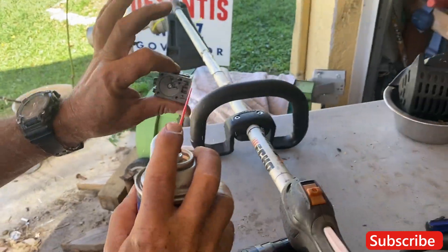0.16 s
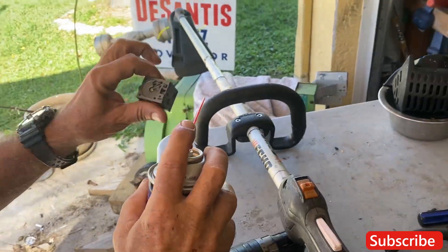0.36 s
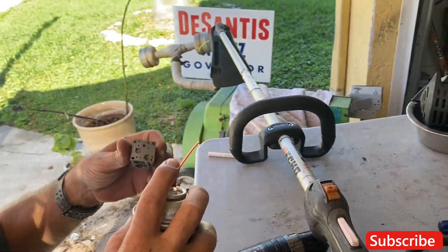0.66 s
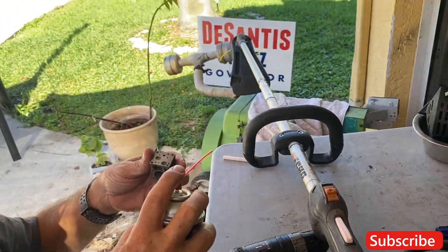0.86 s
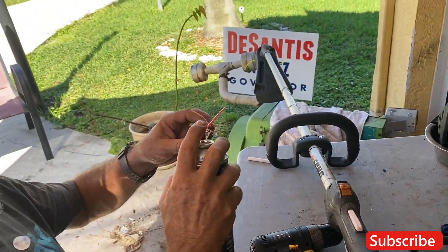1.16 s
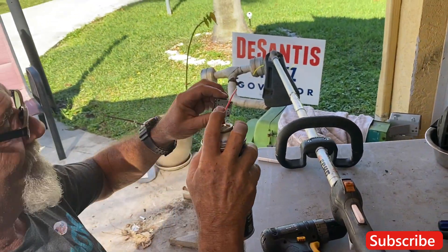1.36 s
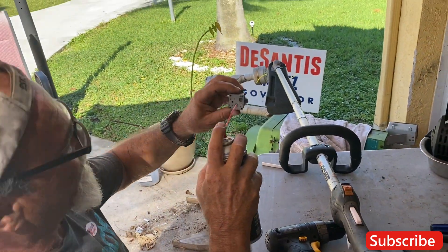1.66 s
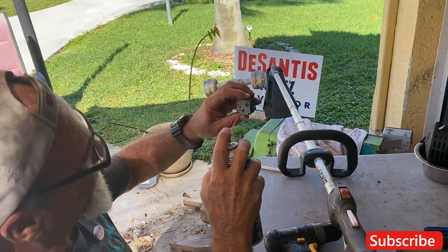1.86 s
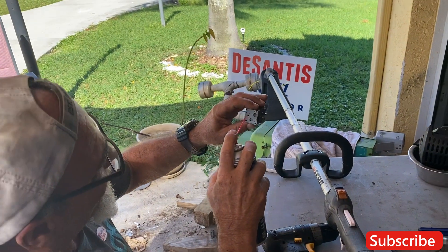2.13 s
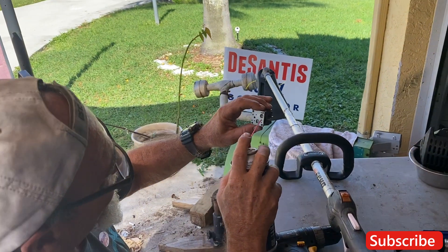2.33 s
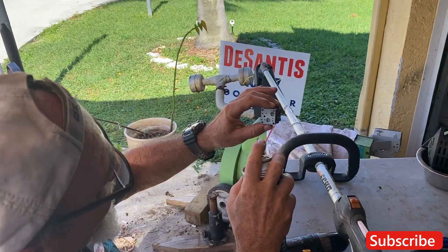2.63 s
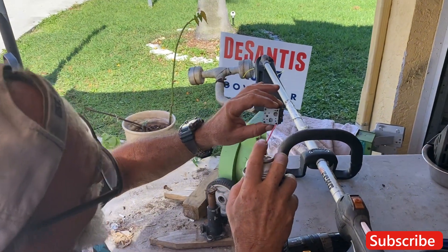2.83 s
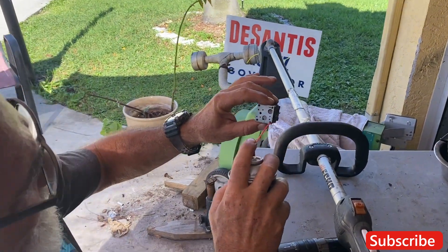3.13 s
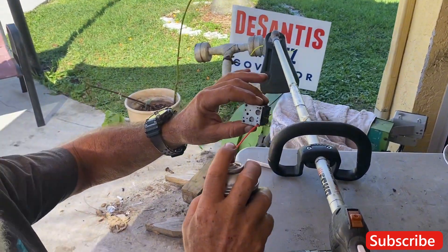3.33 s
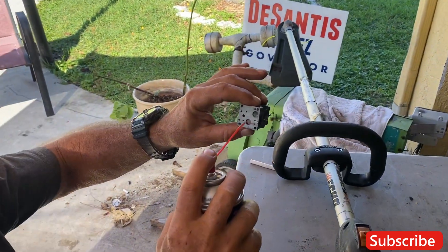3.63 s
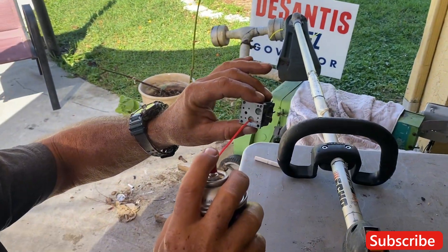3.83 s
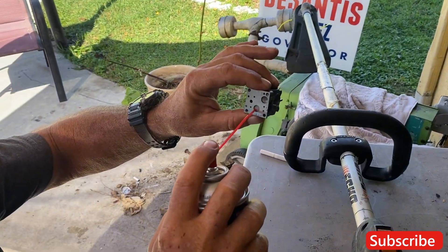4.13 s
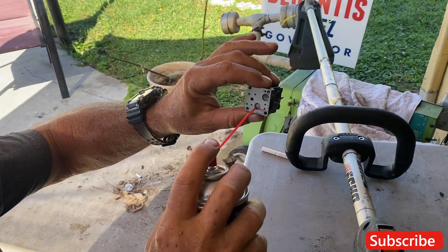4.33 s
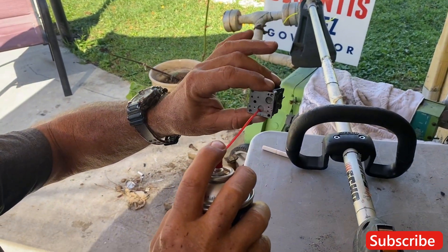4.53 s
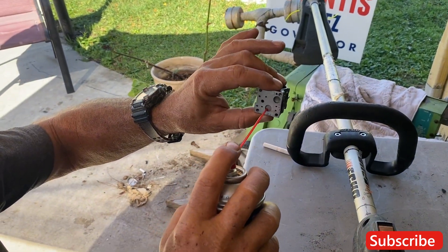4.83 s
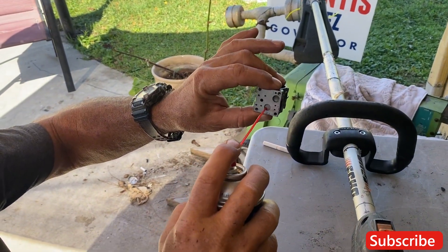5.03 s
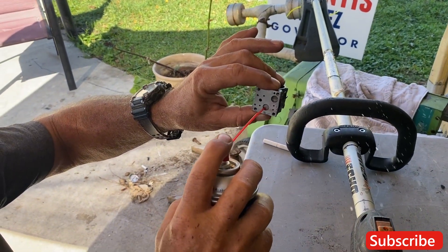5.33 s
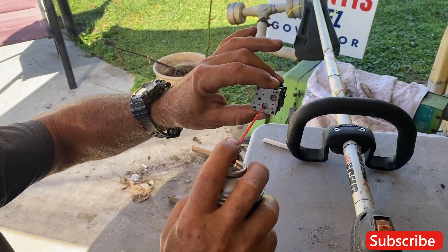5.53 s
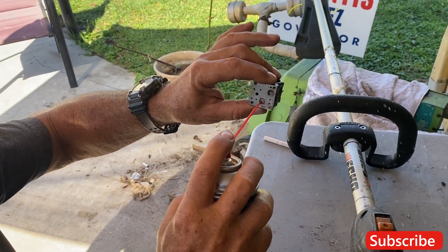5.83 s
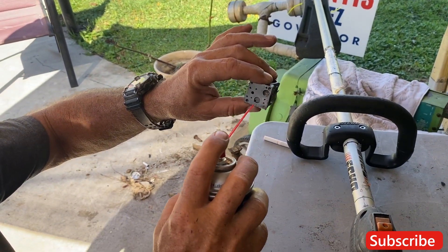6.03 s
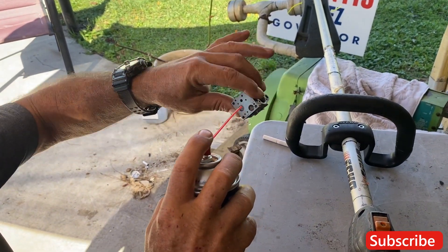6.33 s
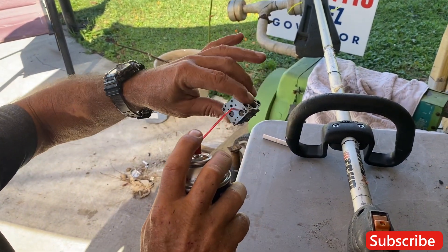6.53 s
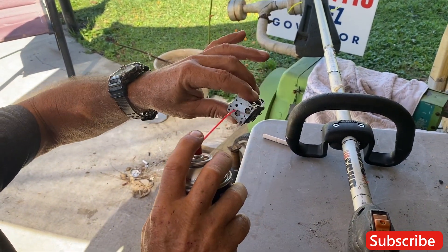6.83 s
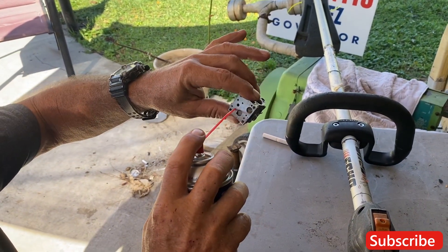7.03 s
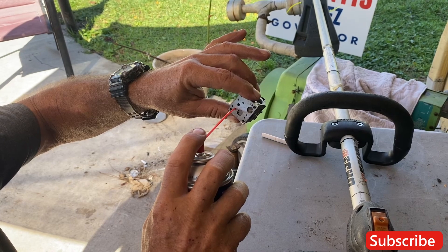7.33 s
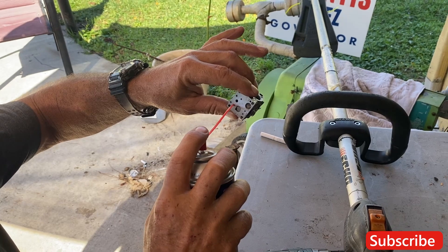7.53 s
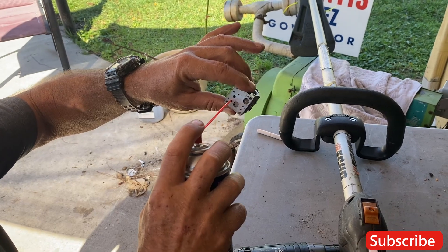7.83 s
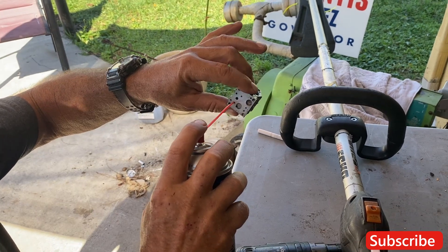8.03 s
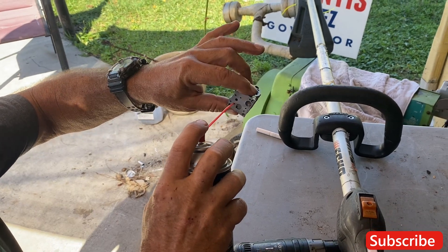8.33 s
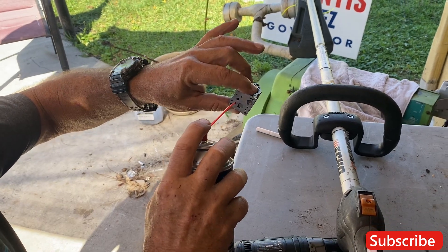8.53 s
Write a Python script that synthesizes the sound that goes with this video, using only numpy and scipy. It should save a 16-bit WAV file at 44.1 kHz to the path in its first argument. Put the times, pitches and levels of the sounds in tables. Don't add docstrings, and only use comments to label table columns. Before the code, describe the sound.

Throughout, soft low outdoor rumble and street wash, with a thin buzzing whine and hiss of a distant motor that sinks away after about 4.5 seconds. At 0.1 a knock and metal tick with soft bumps; around 0.5 a cluster of light clicks and a scuff. Quiet until dull bumps at 1.4-1.5. From 2.2 to 3 cloth drags, a faint low seat creak and a sharp snap at 2.58. A small part bounces three times at 3.35-3.45, then steps and raps to 3.95, with more thumps at 4.45-4.6. From 4.8 an aerosol sputters in tiny squeaky spits, swelling to a strong hiss near 5.25 and again at 5.7 alongside clacks and a deep jolt. Sparse scuffs and scrapes follow, with knocks and a stronger cloth rub around 7.25-7.4. At 8.26 a loud ringing bang with garage echo, then weak whistling spurts until 8.68.

```python
import sys
import numpy as np
from scipy import signal
from scipy.fft import rfft, irfft, next_fast_len
from scipy.io import wavfile
from scipy.ndimage import uniform_filter1d, map_coordinates

SR = 44100
rng = np.random.default_rng(int(sys.argv[2]) if len(sys.argv) > 2 else 0)


def put_to_file(sound):
    columns = np.atleast_2d(sound).T
    safe = np.clip(columns, -1, 1)
    whole_steps = np.round(safe * 32767)
    wavfile.write(sys.argv[1], SR, whole_steps.astype(np.int16))


def amplitude_ratio(level_db):
    exponent = np.asarray(level_db, float) / 20
    return 10 ** exponent


N = 382788

# pitch_hz, level_db (per Hz)
FIZZ_COLOUR = [(5000, -27.5), (8500, -9), (9960, -4), (11000, -12), (12300, -11), (15800, -17.5)]
# pitch_hz, lead_radians
OPEN_LEAD = [(0, -2), (520, -0.57), (1290, -3.5), (2580, -1.45), (6890, -2.5), (9500, 0), (16000, 15.5)]
# pitch_hz, likeness_0_to_1
CONTACT_ALIKE = [(60, 0.79), (240, 0.9), (950, 0.38), (15000, 0.4)]


def unit(x):
    return x / np.sqrt(np.mean(x ** 2) + 1e-20)


def along(points, hz):
    f, v = np.transpose(points)
    return np.interp(np.log(hz + 1), np.log(f + 1), v)


def curves(*tables):
    t = np.arange(N) / SR
    parts = []
    for rows in map(np.array, tables):
        parts.append([np.interp(t, rows[:, 0], c, left=-200, right=-200) for c in rows.T[1:]])
    return np.max(parts, axis=0)


def wobble(rate):
    steps = np.arange(0, N + 32, 32)
    knots = rng.standard_normal(int(N * rate / SR) + 4)
    smooth = map_coordinates(knots, [steps * rate / SR], mode="nearest")
    return np.interp(np.arange(N), steps, smooth)


def filtered(x, response):
    m = next_fast_len(x.shape[-1] + 4096)
    return irfft(rfft(x, m) * response(np.fft.rfftfreq(m, 1 / SR)), m)[..., :x.shape[-1]]


def peaks(modes, hz, base_db):
    return amplitude_ratio(base_db) + sum(amplitude_ratio(db) * w * w / (w * w + 4 * (hz - c) ** 2) for c, w, db in modes)


def ports(pair, lead, alike, shade=((1, 0),)):
    def side(sign):
        def response(hz):
            turn = np.arccos(np.clip(along(alike, hz), 0, 1)) / 2 * hz / (hz + 50)
            lead_radians = np.interp(hz, *np.transpose(lead)) - lead[0][1]
            lag = amplitude_ratio(.5 * sign * along(shade, hz)) * np.exp(.5j * sign * lead_radians)
            return lag * [np.cos(turn), sign * np.sin(turn)]
        return filtered(pair, response).sum(axis=0)
    return np.array([side(1), side(-1)])


def rush(colour, patchy_db, size=(3, 10)):
    z = signal.stft(rng.standard_normal((2, N)), nperseg=256)[2]
    field = uniform_filter1d(rng.standard_normal(z.shape[1:]), size=size[0], axis=0)
    field = uniform_filter1d(field, size=size[1], axis=1)
    pair = signal.istft(z * amplitude_ratio(patchy_db * unit(field)), nperseg=256)[1][:, :N]
    return unit(filtered(pair, colour))


def whine():
    # multiple_of_shaft, level_db, upper_sideband_db
    orders = [(14, -10, -7), (15, -5, -9), (16, 0, -4), (17, -8, -12), (18, -4, -4), (19, -11, -12),
              (20, 0, -3), (21, -4, -8), (22, -4, -2), (23, -5, -11), (24, -11, -12), (25, -2, -5),
              (26, -13, -11), (27, -4, -5), (28, -11, -9), (29, -3, 1), (30, -13, -10), (31, -5, -4),
              (32, -12, -12), (33, -14, -16)]
    shaft_hz, shaft_sag_hz_per_s2 = 263.9, .07
    sideband_hz, sideband_sag_hz_per_s, lower_db = 118, 5.5, -5
    t = np.arange(N) / SR
    turn = 2 * np.pi * (shaft_hz * t - shaft_sag_hz_per_s2 * np.minimum(t, 4.5) ** 3 / 3)
    turn = turn + .3 * wobble(2) + .025 * wobble(30)
    slow = 2 * np.pi * (sideband_hz * t - sideband_sag_hz_per_s * t * t / 2) + 1.5 * wobble(3)
    turn, slow = (np.float32(x % (2 * np.pi)) for x in (turn, slow))
    lines = []
    for k, own_db, upper_db in orders:
        lines += [(k, 0, own_db), (k, 1, upper_db), (k, -1, upper_db + lower_db)]
    swell = amplitude_ratio(5 * np.array([wobble(2) for _ in range(8)]))
    tones = 0
    for n, (k, side, db) in enumerate(lines):
        tones = tones + amplitude_ratio(db) * swell[n % 8] * np.sin(k * turn + side * slow + n * n)
    dying = amplitude_ratio(-3 * np.clip(t - 4.5, 0, 3))
    return dying * unit(tones)


def air():
    # time_s, level_db
    street_level = [(0.0, -53.5), (0.24, -57.5), (0.75, -61), (1.57, -58.5), (2.25, -61.5), (3.41, -58),
                    (3.53, -52.5), (4.25, -59), (4.64, -55.5), (4.91, -59.5), (5.97, -58.5), (6.55, -60),
                    (7.3, -60), (8.68, -59.5)]
    traffic_level = [(0.0, -52), (0.3, -60), (0.77, -65), (1.59, -55), (2.3, -65), (2.9, -55), (4.71, -46),
                     (4.95, -55), (5.4, -48), (6.9, -55), (8.68, -49)]
    hiss_level = [(0, -62.5), (.8, -61.5), (3.9, -62), (4.3, -67), (5.5, -71), (6.4, -80), (7.7, -79.5),
                  (8.68, -64)]
    # pitch_hz, level_db (per Hz)
    rumble_colour = [(15, -46), (25, -23), (49, -5.5), (71, -3.5), (129, -9), (300, -28), (390, -78.5),
                     (660, -120)]
    street_colour = [(88, -7.5), (150, -6.5), (512, -12.5), (850, -14), (1380, -24), (7680, -37.5),
                     (10100, -49), (11800, -49), (15800, -56)]
    hiss_colour = [(880, -45.5), (1500, -5.5), (3270, -6.5), (3820, 0), (7470, -3), (8580, -3),
                   (10000, -14), (10900, -17), (13200, -17), (15800, -41)]
    # pitch_hz, likeness_0_to_1
    air_alike = [(60, 0.88), (240, 0.65), (950, 0), (4000, 0.21), (15000, .6)]
    (street_db,), (traffic_db,), (hiss_db,) = curves(street_level), curves(traffic_level), curves(hiss_level)
    rumble = rush(lambda hz: amplitude_ratio(along(rumble_colour, hz)), patchy_db=2.5)
    rumble = amplitude_ratio(traffic_db + 0.5 + 2.2 * wobble(9)) * rumble
    street = rush(lambda hz: amplitude_ratio(along(street_colour, hz)), patchy_db=.6)
    street = amplitude_ratio(street_db + 3.5 + 0.99 * wobble(4)) * street
    hiss = rush(lambda hz: amplitude_ratio(along(hiss_colour, hz)), patchy_db=3, size=(2, 90))
    hiss = hiss + amplitude_ratio(0.5) * whine() * [[1], [.3]]
    return ports(rumble + street + amplitude_ratio(hiss_db) * hiss, OPEN_LEAD, air_alike)


def stand():
    # start_s, peak_db, pitch_hz
    shakes = [(.004, -33, 47.8), (0.089, -30.5, 126.5), (0.139, -38, 68.5), (0.483, -40, 121),
              (1.412, -40, 121), (1.493, -38, 78.6), (1.887, -44.5, 71.5), (3.592, -34, 140),
              (3.824, -32, 39.3), (3.823, -23, 62), (3.94, -26.5, 158), (4.449, -29, 66),
              (4.468, -27.5, 134.5), (4.596, -27, 49.8), (4.67, -30, 71.8), (5.246, -33, 52.7),
              (5.73, -21, 58.3), (6.094, -37.5, 81.7), (6.427, -39.5, 50), (7.249, -28, 57.3)]
    # start_s, peak_db, pitch_hz
    jolts = [(4.788, -37.5, 75.4), (6.005, -34.5, 56), (7.517, -35, 55), (7.607, -33, 40.4),
             (7.607, -25.5, 85), (8.53, -41, 70), (8.257, -27, 40.4), (8.26, -25, 150), (8.298, -30, 95),
             (3.465, -36, 160), (6.56, -38, 66)]
    rock_db = -16.5
    out, t = np.zeros((2, N + SR)), np.arange(SR // 2) / SR
    swings = [(s, db, hz, .41 * (60 / hz) ** .66) for s, db, hz in shakes]
    swings += [(*row, .19) for row in jolts]
    for s, db, hz, t60 in swings:
        upper, turn = rng.uniform([1.4, 0], [1.9, 2 * np.pi])
        swing = np.sin(2 * np.pi * hz * t) + 0.3 * np.sin(2 * np.pi * upper * hz * t + turn)
        swing = swing + amplitude_ratio(rock_db) * np.outer([1, -1], np.sin(2 * np.pi * hz * t + 3 * turn))
        fade_db = -60 * (t / t60) ** 1.16
        out[:, round(s * SR):][:, :len(t)] += amplitude_ratio(db + fade_db) * (1 - np.exp(-t / 0.0034)) * swing
    return out[:, :N]


def scuffs():
    # start_s, hardest_s, end_s, level_db
    drags = [(.53, .555, .63, -62), (2.188, 2.25, 2.45, -63), (2.4, 2.46, 2.62, -56),
             (2.45, 2.52, 2.68, -58), (2.575, 2.59, 2.66, -56), (2.637, 2.794, 3.0, -67.5),
             (3.105, 3.122, 3.37, -63), (4.186, 4.236, 4.44, -69.5), (5.867, 5.885, 5.96, -62.5),
             (5.95, 6.2, 6.35, -71), (6.554, 6.625, 6.7, -65.5), (7.33, 7.355, 7.46, -47)]
    # pitch_hz, level_db (per Hz)
    cloth = [(180, -46), (300, 7.5), (337, -14), (443, -8), (490, -2.5), (3120, -5.5), (9500, -20.5),
             (12400, -72), (20900, -120)]
    # time_s, pitch_hz, level_db
    seat = [
        (2.41, 257.4, -72),
        (2.47, 254, -62),
        (2.545, 247.5, -60),
        (2.56, 242, -68),
    ]
    strokes = [[(start, db - 12), (hardest, db), (end, db - 22.5)] for start, hardest, end, db in drags]
    drag_db, = curves(*strokes)
    grains = amplitude_ratio(drag_db + 10.0 + 1.2 * wobble(90))
    body = rush(lambda hz: amplitude_ratio(along(cloth, hz)), patchy_db=1.5)
    fizz = rush(lambda hz: amplitude_ratio(along(FIZZ_COLOUR, hz)), patchy_db=7)
    creak_hz, creak_db = curves(seat)
    phase = 2 * np.pi * np.cumsum(creak_hz) / SR
    creak = np.sin(phase) + 0.2 * np.sin(2 * phase) + 0.12 * np.sin(3 * phase)
    return ports(grains * (body + amplitude_ratio(-16.5) * fizz), OPEN_LEAD, CONTACT_ALIKE) + amplitude_ratio(creak_db + 8) * creak


def garage(t):
    # pitch_hz, t60_s
    decay = [(150, 0.3), (1000, 0.23), (4000, 0.31), (12000, 0.33)]
    hz, frame, z = signal.stft(rng.standard_normal((2, len(t))), SR, nperseg=128)
    z = z * amplitude_ratio(-60 * frame / along(decay, hz)[:, None])
    tail = signal.istft(z, SR, nperseg=128)[1][:, :len(t)]
    return tail * (1 - np.exp(-t / 0.0086))


def taps():
    # start_s, peak_db, edge_hz, flat_hz
    bounces = [
        (3.351, -23, 1250, 600),
        (3.388, -24, 820, 580),
        (3.449, -28, 850, 520),
    ]
    # start_s, peak_db, ring_hz, t60_s
    hard = [(.085, -28, 780, 0.07), (.518, -36, 1490, 0.008), (.545, -32, 2110, 0.055),
            (1.4, -39, 766, 0.083), (2.59, -49, 2800, .01), (8.266, -15.5, 712, 0.14),
            (8.265, -27, 470, .12), (8.264, -21, 1850, .2), (8.266, -22, 2560, .11), (8.27, -28, 3025, .25)]
    ticks = [(0.111, -34, 4180, 0.0052), (0.479, -38, 4650, .012), (0.571, -39, 2230, 0.022),
             (2.18, -35, 990, 0.0033), (3.692, -41, 5000, 0.004), (3.748, -39, 4300, 0.0045),
             (3.766, -39, 4870, 0.0059), (7.812, -45.5, 1500, 0.0061), (.112, -38, 11500, .004),
             (.428, -45, 12500, .004), (.48, -47, 11000, .004), (.555, -37, 2900, .02),
             (.562, -41, 4000, .015), (.59, -44, 2700, .015), (2.592, -36, 3300, .006),
             (2.595, -36, 2200, .008), (3.507, -42, 1300, .008)]
    bumps = [(1.505, -32, 365, 0.096), (1.537, -30.5, 284, 0.12), (4.462, -30, 480, .07),
             (2.347, -43, 388, 0.036), (2.403, -41, 330, 0.039), (.128, -33, 300, .06),
             (.152, -33, 270, .05), (.212, -36, 340, .04), (3.462, -33, 570, .06), (3.476, -36, 330, .05),
             (4.464, -29, 290, .07), (4.485, -30, 260, .06), (4.572, -32, 300, .05)]
    # start_s, peak_db, ring_hz, t60_s
    snap = [
        (2.5827, -24, 2900, .006),
        (2.5785, -38, 2700, .005),
        (2.58304, -21, 2900, .006),
    ]
    # rattle_db, room_db, hardness (top over ring pitch), lower_mode_share
    kinds = [
        (-9, -12, 5, .4),
        (-8, -9, 2.4, .12),
        (-11.5, -18.5, 3.5, .2),
        (-26, -15.5, 2.2, .3),
        (-30, -26, 1.2, .3),
    ]
    # pitch_hz, lead_radians
    tap_lead = [(0, 0), (1200, .6), (2400, -1.4), (5000, -.8), (16000, 8)]

    def mode(f, c, w):
        return 1j * f * w / (c * c - f * f + 1j * f * w)

    out, t = np.zeros((2, N + SR)), np.arange(SR // 5) / SR
    drops = []
    for s, db, edge_hz, flat_hz in bounces:
        drops += [(s, db, edge_hz, .014), (s + .0055, db + 0.5, flat_hz, .016)]
    contacts = [(*row, *kind) for kind, rows in zip(kinds, [drops, hard, ticks, bumps, snap]) for row in rows]
    for s, db, hz, t60, rattle_db, room_db, hardness, lower in contacts:
        width = 2.5 / t60

        def part(f):
            soft = 1 / (1 + 1j * f / min(hardness * hz, 14000)) ** 2
            ring = mode(f, hz, width) + lower * mode(f, .66 * hz, 1.5 * width)
            return soft * (ring + .35 * width / hz * mode(f, 1.9 * hz, 1.6 * hz))

        def around(f):
            return (f / hz) ** 0.44 / (1 + (f / hz / 0.99) ** 2.46)

        push = amplitude_ratio(rattle_db - 6.5 - 60 * t / 0.027) * rng.standard_normal((2, len(t)))
        push[:, 0] = 1, .2
        direct = filtered(push, part)
        room = amplitude_ratio(room_db + 11) * filtered(garage(t), around)
        out[:, round(s * SR):][:, :len(t)] += amplitude_ratio(db + 0.5) * (direct / np.abs(direct).max() + room)
    return ports(out[:, :N], tap_lead, CONTACT_ALIKE) * amplitude_ratio([[-.7], [.7]])


def knocks():
    # start_s, peak_db, t60_s
    blows = [
        [(0.126, -47, .12), (0.213, -58, .05), (1.503, -50, 0.07), (7.612, -55, .05)],
        [(.088, -35, .15), (1.387, -45, 0.27), (3.598, -46, .1), (3.647, -40, .11), (3.82, -31, 0.066),
         (3.928, -32.5, .18), (4.456, -31, .08), (7.236, -37.5, 0.35), (7.326, -33, 0.094)],
        [(5.718, -29.5, 0.11), (5.826, -32, .1), (6.717, -51.5, .13)],
        [(0.471, -41, 0.074), (3.564, -37.5, 0.16), (3.941, -26.5, 0.089), (4.567, -28.5, 0.19)],
        [(4.619, -43.5, .059), (6.928, -42, 0.27), (8.099, -48.5, .12), (8.24, -38, 0.053)],
        [(8.258, -18.5, 0.11), (8.262, -14, 0.21)],
    ]
    # pitch_hz, width_hz, level_db
    bench = [(134, 99, 6.5), (474, 23, 6), (720, 130, -0.5), (1880, 110, 2.5), (2460, 89, 9.5),
             (3000, 58, -7), (3330, 46, -5)]
    # pitch_hz, lead_radians; pitch_hz, level_db
    knock_lead = [(0, 0.5), (3100, 6.5), (7000, 4.5), (16000, 24.5)]
    knock_shade = [(120, 0), (300, 4), (550, 3), (1650, 1.5), (5000, -2), (15000, 0)]
    # bass_db, edge_db, top_db, rise_s
    kinds = [(15.4, -14, -24.5, .006), (-1.8, -10, -18, .0045), (0, -4.5, -8, .008),
             (-10, -14.5, -16.5, .002), (-16, -4, -13, .005), (-25, -2, -8, .002)]
    out, t = np.zeros((2, N + SR)), np.arange(SR // 4) / SR
    hits = [(*row, *kind) for kind, rows in zip(kinds, blows) for row in rows]
    for s, db, t60, bass_db, edge_db, top_db, rise_s in hits:
        slope = [(60, bass_db + 8.5), (180, bass_db + 13), (900, 0.0085),
                 (2500, edge_db - 2.5), (8000, top_db - 3.5), (15000, top_db - 21.0)]
        ripple_db = rng.normal(0, 2.5, 120)

        def colour(hz):
            ripple = np.interp(hz, np.arange(120) * SR / 240, ripple_db)
            return amplitude_ratio(along(slope, hz) + ripple) * peaks(bench, hz, base_db=0) ** 0.44

        rise = 1 - np.exp(-t / rise_s)
        blow = rng.standard_normal((2, len(t))) * amplitude_ratio(-60 * t / t60)
        burst = filtered(rise * (blow + amplitude_ratio(-2.5) * garage(t)), colour)
        out[:, round(s * SR) - 88:][:, :len(t)] += amplitude_ratio(db + 8) * burst
    return ports(out[:, :N], knock_lead, CONTACT_ALIKE, knock_shade)


def whistles():
    # start_s, length_s, pitch_hz, level_db
    clear = [(5.102, 0.013, 3400, -48), (5.126, 0.018, 3400, -44), (5.187, 0.012, 4440, -40),
             (8.49, 0.036, 3400, -32), (8.598, 0.01, 4850, -47), (8.613, 0.034, 2500, -49.5)]
    chirps = [(.008, 0.026, 1710, -55.5), (0.783, 0.06, 2700, -71), (1.786, 0.056, 2780, -65.5),
              (2.806, .04, 2800, -62), (2.87, 0.04, 2820, -60), (2.925, 0.045, 2860, -60)]
    squeals = [(4.928, 0.023, 3350, -42), (5.018, 0.014, 3290, -43), (5.489, 0.023, 3255, -47)]
    rasps = [(4.835, .035, 3800, -48), (4.846, .01, 4900, -47), (5.012, .02, 4300, -47),
             (5.2, .02, 4450, -45), (4.962, .012, 4200, -48), (8.527, .012, 4900, -50),
             (8.488, .006, 4200, -48), (5.515, .02, 4600, -46), (5.805, .006, 4400, -48),
             (8.395, .04, 3400, -44), (8.4, .035, 4900, -50), (8.61, .035, 3450, -44),
             (8.612, .02, 4200, -50)]
    overtone_db, clear_shake, rasp_shake = -21.5, 4.5, 11
    out = np.zeros(N + SR)
    notes = [(*row, overtone_db, clear_shake) for row in [*clear, *chirps]]
    notes += [(*row, -9, clear_shake) for row in squeals]
    notes += [(*row, overtone_db, rasp_shake) for row in rasps]
    for s, length, hz, db, over_db, unrest in notes:
        t = np.arange(round(1.7 * length * SR)) / SR
        shake = uniform_filter1d(rng.standard_normal(SR // 4), size=120)[:len(t)]
        phase = 2 * np.pi * hz * t + unrest * shake
        shape = np.clip(t / 0.0021, 0, 1) * amplitude_ratio(-900 * np.clip(t - length, 0, 1))
        tone = np.sin(phase) + amplitude_ratio(over_db) * (np.sin(2 * phase) + .7 * np.sin(4 * phase))
        out[round(s * SR):][:len(t)] += amplitude_ratio(db - 0.5) * shape * tone
    return amplitude_ratio(2.2 * wobble(90)) * out[:N] * [[1], [.25]]


def spray():
    # start_s, end_s, start_db, end_db
    spurts = [(4.792, 4.8, -48, -68), (4.828, 4.85, -52, -47), (4.85, 4.878, -47, -51),
              (4.923, 4.965, -47.5, -54.5), (4.954, 4.971, -49, -50), (5.005, 5.03, -51, -46),
              (5.04, 5.108, -49, -41.5), (5.128, 5.155, -50, -48), (5.185, 5.222, -42, -41),
              (5.215, 5.256, -41, -31.5), (5.254, 5.295, -31.5, -33.5), (5.293, 5.316, -34, -43),
              (5.314, 5.355, -44, -50), (5.465, 5.477, -56, -62), (5.495, 5.532, -54, -51),
              (5.625, 5.652, -58, -46), (5.65, 5.69, -42, -36), (5.688, 5.745, -36, -33),
              (5.743, 5.775, -33, -37), (5.773, 5.853, -46, -57), (8.384, 8.438, -48, -49),
              (8.482, 8.497, -51, -54), (8.52, 8.549, -55, -54), (8.582, 8.615, -51, -50),
              (8.607, 8.655, -48, -53.5), (8.664, 8.675, -55, -57)]
    # pitch_hz, level_db (per Hz)
    jet_colour = [(350, -46), (600, -6), (1070, -8.5), (1570, -13), (4230, 2), (4800, -1.5), (6720, -1.5),
                  (9500, -22.5), (12400, -89), (20900, -120)]
    # pitch_hz, width_hz, level_db
    straw_modes = [(2500, 510, -9), (3400, 440, -1.5), (4200, 530, 0.5), (4900, 440, -0.5),
                   (6600, 320, -18), (8150, 523, -10.5)]
    tail_db, tail_db_per_s = -18, 250
    fizz_db, fizz_floor_db, fizz_grows, full_db = -1, -12, 1.1, -36.5
    jet, t = np.zeros(N + SR), np.arange(SR // 5) / SR
    for start, end, from_db, to_db in spurts:
        length, span = end - start, slice(round(start * SR), round(start * SR) + len(t))
        shut = np.clip(t - length, 0, 1)
        closing = np.maximum(amplitude_ratio(-1400 * shut), amplitude_ratio(tail_db - tail_db_per_s * shut))
        opening = np.clip(t / 0.0022, 0, 1)
        flow = opening * closing * amplitude_ratio(np.interp(t, [0, length], [from_db, to_db]))
        jet[span] = np.maximum(jet[span], flow)
    jet = jet[:N]
    fizz_gain = amplitude_ratio(fizz_db) * (jet / amplitude_ratio(full_db)) ** fizz_grows
    top = jet * np.clip(fizz_gain, amplitude_ratio(fizz_floor_db), amplitude_ratio(fizz_db))
    broad = jet / (jet + amplitude_ratio(-36))
    strong, weak = np.sqrt(broad), np.sqrt(1 - broad)
    straw = rush(lambda hz: peaks(straw_modes, hz, base_db=-30), patchy_db=5, size=(2, 5))
    body = rush(lambda hz: amplitude_ratio(along(jet_colour, hz)), patchy_db=1.5)
    fizz = rush(lambda hz: amplitude_ratio(along(FIZZ_COLOUR, hz)), patchy_db=2.5)
    froth = rush(lambda hz: amplitude_ratio(along(FIZZ_COLOUR, hz)), patchy_db=6.5, size=(1, 12))
    fizz = strong * fizz + weak * froth
    spit = amplitude_ratio(1.5 + (1 + 2.2 * (1 - broad)) * wobble(150))
    return spit * (jet * (strong * body + amplitude_ratio(0.5) * weak * straw) + top * fizz)


def scene():
    # pitch_hz with lead_radians, likeness_0_to_1, left_over_right_db
    can_lead = [(0, -1), (2400, -2.5), (7150, -2.5), (9000, 1.5), (15300, 9.5)]
    can_alike = [(500, 0.7), (4000, 0.9), (15000, 0.5)]
    can_shade = [(550, 0), (5000, -2.5), (15000, 0)]
    can = ports(spray() + whistles(), can_lead, can_alike, can_shade)
    return air() + stand() + scuffs() + taps() + knocks() + can


def roll_off(x):
    return signal.sosfilt(signal.butter(12, 16660, fs=SR, output="sos"), x)


def record(dry):
    # pitch_hz, level_db
    overall_colour = [(20, -22), (45, 0), (9000, 0), (10000, -6.5), (11000, 2), (15000, 6)]
    mix = filtered(dry, lambda hz: amplitude_ratio(along(overall_colour, hz)) * (hz < 15850))
    return roll_off(mix)


dry = scene()
out = record(dry)
put_to_file(out)
```